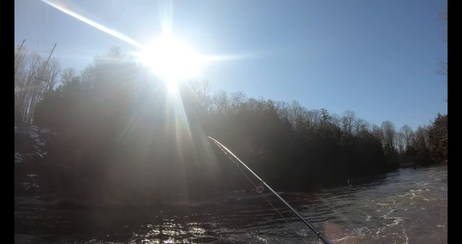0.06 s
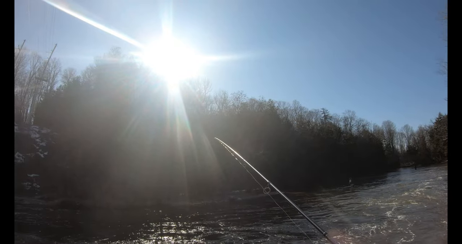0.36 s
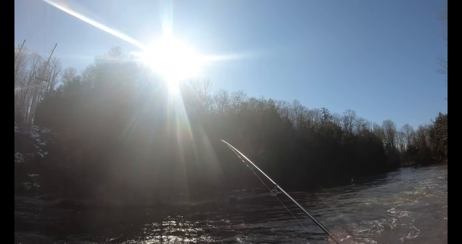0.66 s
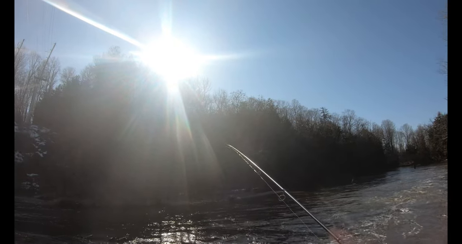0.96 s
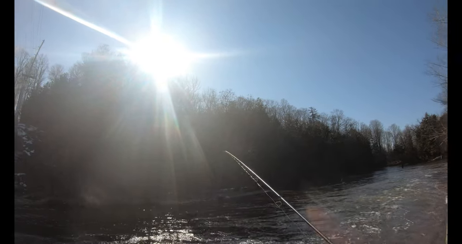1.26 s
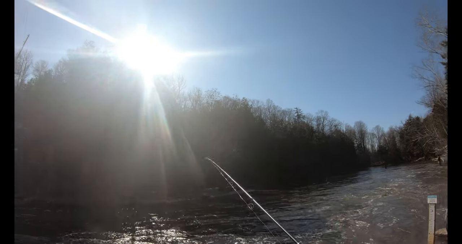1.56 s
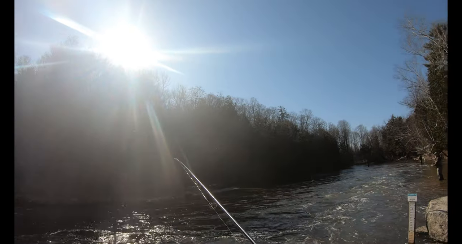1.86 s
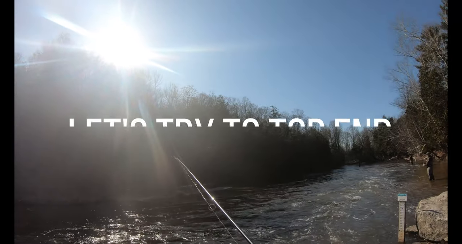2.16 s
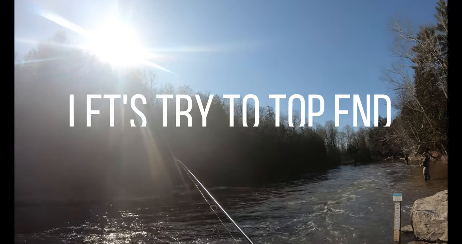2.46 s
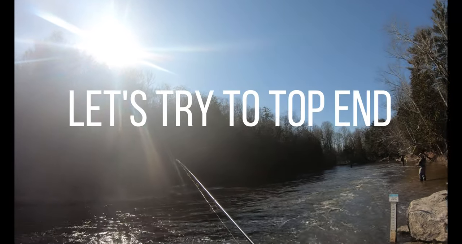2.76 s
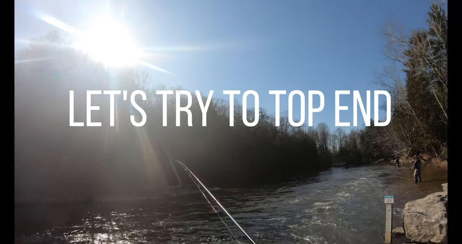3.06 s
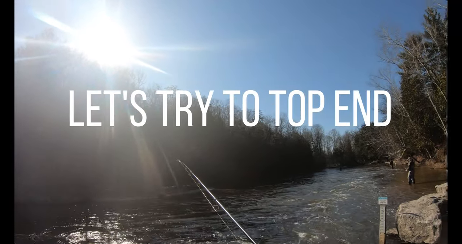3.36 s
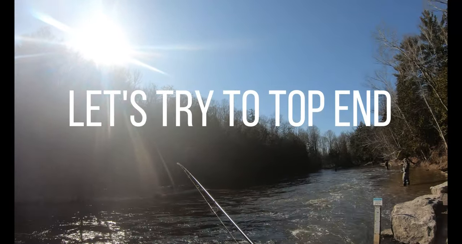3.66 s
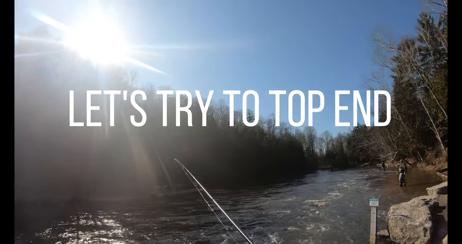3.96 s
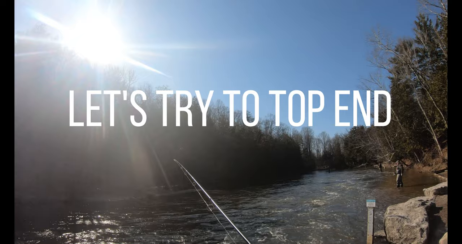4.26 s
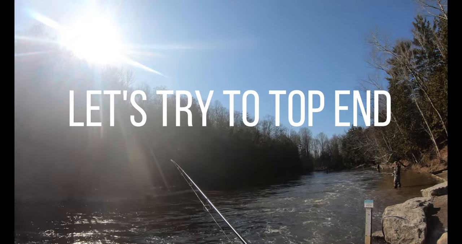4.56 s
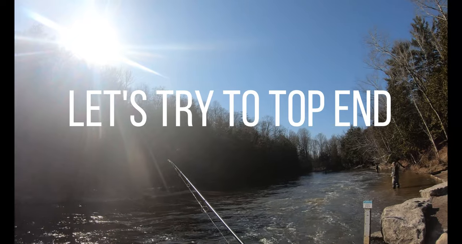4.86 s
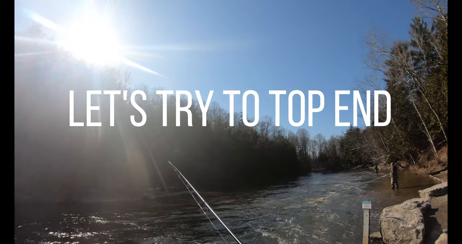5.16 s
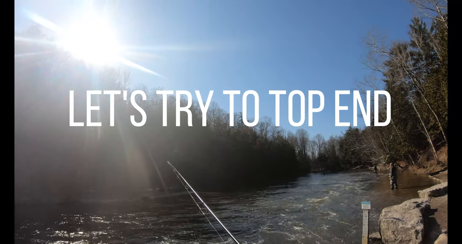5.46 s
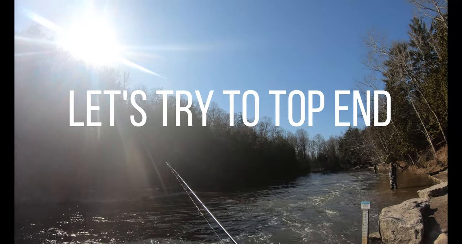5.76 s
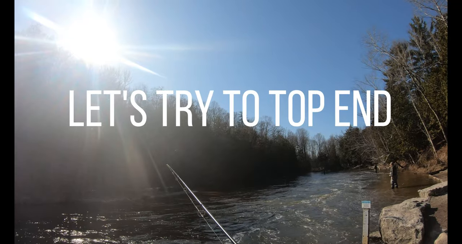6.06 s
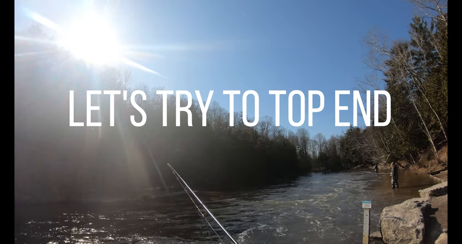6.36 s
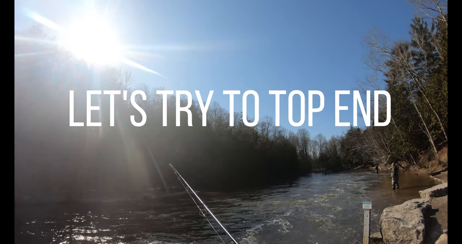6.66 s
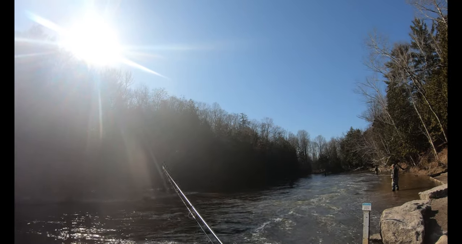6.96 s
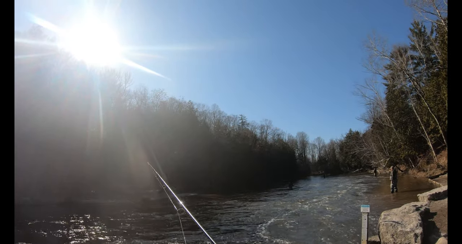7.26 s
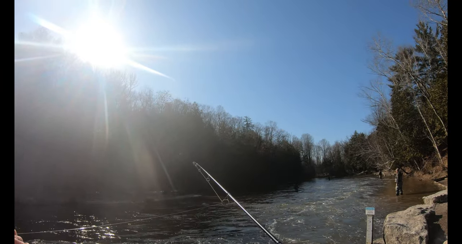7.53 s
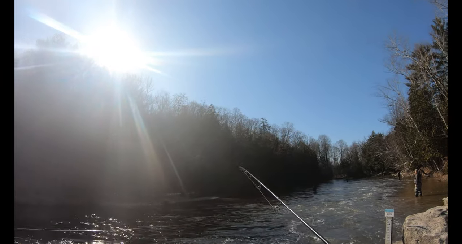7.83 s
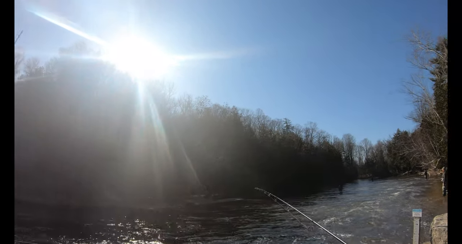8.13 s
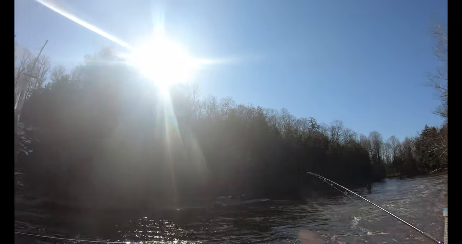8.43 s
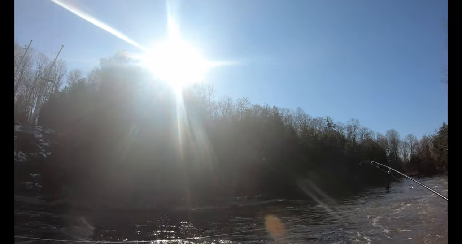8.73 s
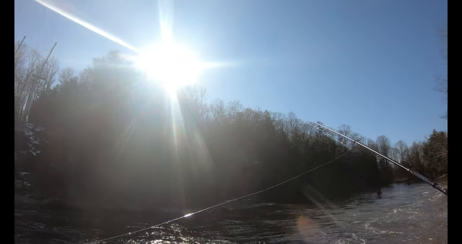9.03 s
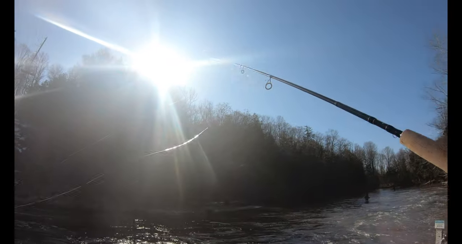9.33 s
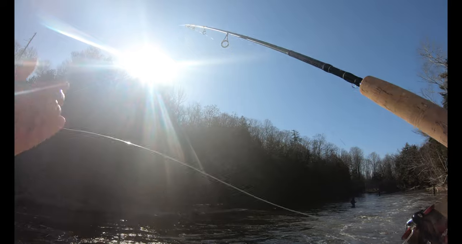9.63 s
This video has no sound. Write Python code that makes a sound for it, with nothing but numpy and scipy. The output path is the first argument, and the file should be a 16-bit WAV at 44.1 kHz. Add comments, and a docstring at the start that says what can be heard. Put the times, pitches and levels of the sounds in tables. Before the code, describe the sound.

Heard from the bank through microphones worn by an angler, river water churns and gurgles steadily, with little splashes, a few dull slaps of waves and low gusts of wind. Past the middle the wind softens and the sound opens out. Close by and slightly to the right come light taps of a fishing rod and a brief, quiet ratcheting of the reel, while the river keeps flowing.

```python
"""A fast river rushes below a dam, heard by two microphones worn by an angler. From the start, turbulence
and ringing bubbles make the water roar and fizz, wind eddies rumble on the ports, and waves break and
splash nearby. Near 1.5 s the angler turns downstream; from 5 s the wind eases and mono opens into stereo.
From 6.3 s the rod knocks now and then. Around 8 s the reel's ratchet ticks through a short run of line
as the angler turns back across the river."""
import sys
import numpy as np
from scipy import signal
from scipy.fft import rfft, irfft, next_fast_len
from scipy.io import wavfile
from scipy.ndimage import uniform_filter1d, map_coordinates

SR = 44100
rng = np.random.default_rng(int(sys.argv[2]) if len(sys.argv) > 2 else 0)


def generate_wav(signal):
    """Clip the signal to [-1, 1] and save it as 16-bit WAV at the path in sys.argv[1]."""
    frames = np.transpose(np.atleast_2d(signal))
    scaled = np.clip(frames, -1, 1) * 32767
    pcm = np.round(scaled).astype(np.int16)
    wavfile.write(sys.argv[1], SR, pcm)


N = 427329


def amp(db):
    """Decibels to amplitude ratio."""
    return 10 ** (np.asarray(db) / 20)


def unit(pair):
    """Normalise a stereo pair so that its mid signal has rms 1."""
    return pair / np.sqrt(np.mean(pair.mean(0) ** 2) + 1e-20)


def along(points, hz):
    """Interpolate (frequency_hz, value) points on a logarithmic axis."""
    knots_hz, values = np.transpose(points)
    return np.interp(np.log(hz + 1), np.log(knots_hz + 1), values)


def curves(rows):
    """Interpolate each column after time_s to one value per sample."""
    time_s, *columns = np.transpose(rows)
    return [np.interp(np.arange(N) / SR, time_s, column) for column in columns]


def wobble(rate_hz):
    """Smooth random modulation: a spline through rate_hz knots a second."""
    knots = rng.standard_normal(int(N * rate_hz / SR) + 4)
    return map_coordinates(knots, [np.arange(N) * rate_hz / SR])


def filtered(x, response):
    """Linear filtering: multiply the spectrum by a frequency response."""
    size = next_fast_len(N + 8192)
    return irfft(rfft(x, size) * response(np.fft.rfftfreq(size, 1 / SR)), size)[..., :N]


def coloured(x, spectrum):
    """Spectral shaping by (frequency_hz, gain_db) points."""
    return filtered(x, lambda hz: amp(along(spectrum, hz)))


def add(track, start_s, sound):
    """Superpose a sound on a track."""
    part = track[..., max(round(start_s * SR), 0):][..., :sound.shape[-1]]
    part += sound[..., :part.shape[-1]]


def churn(patchy_db):
    """Turbulence: two independent noises, modulated in patches of time and frequency."""
    spectra = signal.stft(rng.standard_normal((2, N)), nperseg=512)[2]
    patches = uniform_filter1d(rng.standard_normal(spectra.shape[1:]), size=12, axis=0)
    patches = uniform_filter1d(patches, size=7, axis=1)
    return unit(signal.istft(spectra * amp(patchy_db * patches / patches.std()), nperseg=512)[1][:, :N])


def bubble(turns, decay_cycles):
    """Trapped air rings as a damped oscillator; turns is its phase in cycles."""
    return np.sin(2 * np.pi * turns) * np.exp(-turns / decay_cycles) * (1 - np.exp(-turns))


def bubbles(count, low_hz, high_hz, decay_cycles, spread_db):
    """Incoherent sum of bubble resonances, most faint and a few strong, from random directions."""
    when, pitch, faintness, direction = rng.random((count, 4)).T[:, :, None]
    t = np.arange(256) / SR
    pitch_hz = low_hz * (high_hz / low_hz) ** pitch
    rings = amp(-spread_db * np.log(faintness + np.exp(-5))) * bubble(pitch_hz * t, decay_cycles)
    index = ((when * N).astype(int) + np.arange(len(t))).ravel()
    mid_side_gains = (1, np.sqrt(2) * np.cos(np.pi * direction))
    return unit(np.array([np.bincount(index, (rings * gain).ravel(), N)[:N] for gain in mid_side_gains]))


def droplets(low_hz, high_hz):
    """Sparse drops thrown up by the current plip as heavily damped resonances."""
    return amp(-21) * bubbles(320, low_hz, high_hz, decay_cycles=3, spread_db=3.5)


# direction of the water by level and by arrival time: frequency_hz, bias (-1 right .. 1 left)
LEVEL_BIAS = [(200, .2), (500, .42), (850, 0.45), (1900, 0.29), (3200, -0.077), (8200, -0.17), (9400, 0.24),
              (12000, .05)]
PHASE_BIAS = [(200, -0.4), (600, -0.6), (1600, -0.3), (2300, -0.13)]
def at_ports(pair, spectrum, side_spectrum):
    """Level and phase differences between the two ports place a coloured, partly diffuse source."""
    size = next_fast_len(N + 8192)
    hz = np.fft.rfftfreq(size, 1 / SR)
    mid, diffuse = rfft(pair, size) * amp(along(spectrum, hz))
    bearing = along(LEVEL_BIAS, hz) + 1j * along(PHASE_BIAS, hz)
    diffuse_share = np.sqrt(np.clip(1 - abs(bearing) ** 2, 0, 1))
    side = amp(along(side_spectrum, hz)) * (bearing * mid + diffuse_share * diffuse)
    return unit(irfft(np.array([mid + side, mid - side]), size)[:, :N])


# the angler's turn: time_s, heading (0 across the river .. 1 downstream)
TURN = [(0, 0.21), (1.45, 0.2), (1.85, 0.85), (7.3, 0.78), (8.1, 0.035), (9.69, 0.07)]
# stereo image at each heading: frequency_hz, side_over_mid_db
IMAGE_ACROSS = [(150, -7.5), (380, -7.5), (700, 1), (1100, 5.5), (1800, 5), (2500, 4), (4200, 0.5),
                (5500, 7), (8000, 7), (10000, 6)]
IMAGE_DOWN = [(150, -37), (380, -8.5), (700, -2), (1400, 9.5), (2300, 1.5), (4200, -4), (5500, 6.5),
              (8000, 8), (10000, 10)]
def turning(pair, across_spectrum, down_spectrum, across_db=0):
    """Directional pickup: the water's spectrum, image and level follow the angler's heading."""
    heading, = curves(TURN)
    across = at_ports(pair, across_spectrum, IMAGE_ACROSS)
    downstream = at_ports(pair, down_spectrum, IMAGE_DOWN)
    return amp(across_db * (1 - heading)) * unit((1 - heading) * across + heading * downstream)


# white water at each heading: frequency_hz, gain_db
ROAR_SPECTRUM_ACROSS = [(120, -17.5), (205, -7.5), (359, -7.5), (470, -10), (720, -12.5), (900, -19.5),
                        (1200, -34.5), (2020, -120)]
ROAR_SPECTRUM_DOWN = [(120, -14), (205, -4.5), (352, -8.5), (480, -11), (920, -19), (1200, -34.5),
                      (2020, -120)]
def roar(surge_db, gulp_db=0.45, gulp_hz=12):
    """Turbulence in distant white water radiates low noise that gulps unevenly."""
    water = turning(churn(patchy_db=0.15), ROAR_SPECTRUM_ACROSS, ROAR_SPECTRUM_DOWN, across_db=2.5)
    return amp(-2 + surge_db + gulp_db * wobble(gulp_hz)) * water


# wavelets at each heading: frequency_hz, gain_db
WASH_SPECTRUM_ACROSS = [(660, -14), (1120, -3), (1260, -6.5), (1750, -14.5), (2050, -16), (2480, -17.5),
                        (2960, -17.5), (4400, -25.5), (5720, -41), (9680, -120)]
WASH_SPECTRUM_DOWN = [(660, -5), (1120, -1), (1560, -13), (1940, -8), (2410, -10.5), (3100, -10.5),
                      (4400, -19.5), (5720, -65), (9680, -120)]
def wash(lapping_db):
    """Air entrainment: breaking wavelets mix midrange noise with ringing bubbles and drops."""
    ringing = amp(-15) * bubbles(8000, low_hz=1413, high_hz=4980, decay_cycles=5.6, spread_db=3)
    water = churn(patchy_db=1.12) + ringing + droplets(low_hz=1505, high_hz=4500)
    return amp(-15.5 + lapping_db) * turning(water, WASH_SPECTRUM_ACROSS, WASH_SPECTRUM_DOWN, across_db=5)


# foam at each heading: frequency_hz, gain_db
FIZZ_SPECTRUM_ACROSS = [(2650, -43), (4500, -6), (6080, -7.5), (8960, -7.5), (9480, -8.5), (10400, -20.5),
                        (11700, -26), (14600, -33), (15500, -49)]
FIZZ_SPECTRUM_DOWN = [(2650, -45), (4500, -2.5), (8240, -10), (9780, -16.5), (12000, -28.5), (14500, -35),
                      (15500, -38)]
def fizz(lift_db):
    """Resonant frequency varies inversely with radius, so the tiny bubbles of foam hiss in the treble."""
    ringing = amp(-9) * bubbles(10000, low_hz=4300, high_hz=11630, decay_cycles=6.3, spread_db=2)
    foam = churn(patchy_db=0.9) + ringing + droplets(low_hz=4500, high_hz=9500)
    return amp(-32.5 + lift_db) * turning(foam, FIZZ_SPECTRUM_ACROSS, FIZZ_SPECTRUM_DOWN, across_db=4)


# upwelling water: frequency_hz, gain_db
BOIL_SPECTRUM = [(110, -27), (190, 2.5), (280, -1.5), (370, -5), (480, -21), (1300, -120)]
# its strength: time_s, level_db
BOIL_LEVEL = [(0, -34), (.3, -29.5), (.5, -29), (.63, -48), (.9, -34), (1.13, -28), (1.3, -31.5),
              (1.52, -28.5), (1.78, -38.5), (1.95, -27.5), (2.15, -34), (2.7, -33.5), (2.9, -36),
              (3.3, -30), (3.55, -32.5), (4.2, -30), (5.28, -32), (5.5, -36.5), (5.9, -31.5), (6.42, -38.5),
              (6.62, -33.5), (6.8, -36), (7.2, -41), (7.6, -38.5), (8.6, -38), (9.12, -34.5), (9.4, -43)]
def boil():
    """Deep water welling up in the current makes amplitude-modulated low noise."""
    return amp(curves(BOIL_LEVEL)[0]) * at_ports(churn(patchy_db=0.86), BOIL_SPECTRUM, IMAGE_DOWN)


# waves near the bank: crest_s, half_length_s, roar_lift_db, surf_db, foam_lift_db
BANK_WAVES = [(.25, 0.24, 0.5, -47, 2.5), (1.278, 0.14, -0.6, -41.5, 3), (1.637, 0.16, 0.8, -45, 7.5),
              (2.853, 0.24, 0.5, -42, 5.5), (3.27, 0.23, 0.5, -46.5, 2), (3.747, 0.2, 1, -44.5, 2.5),
              (4.377, 0.19, 1.1, -41, 7.5), (5.765, 0.2, -1.3, -51.5, 2), (8.346, 0.56, -1, -52, 2.5)]
def waves():
    """Each wave modulates roar, foam and surf with a Gaussian envelope; surf adds in power."""
    crest_s, half_length_s, roar_lift_db, surf_db, foam_lift_db = np.transpose(BANK_WAVES)
    bells = np.exp(-((np.arange(N) / SR - crest_s[:, None]) / half_length_s[:, None]) ** 2)
    return roar_lift_db @ bells, foam_lift_db @ bells, np.sqrt(amp(surf_db) ** 2 @ bells)


# breaking waves at each heading: frequency_hz, gain_db
SURF_SPECTRUM_ACROSS = [(600, -26), (950, -7), (1150, -4), (1370, 2.5), (1650, -21), (2080, -2),
                        (2450, -17), (3000, -12.5), (4400, -15.5), (6000, -45), (9000, -120)]
SURF_SPECTRUM_DOWN = [(400, -17), (700, 7), (1170, 0), (1400, -12), (1600, -15.5), (1900, 0), (2370, -8.5),
                      (2700, -3), (3200, -4), (4400, -12.5), (6000, -46), (9000, -120)]
def surf(lapping_db):
    """Breaking waves trap air, which gurgles by bubble resonance."""
    ringing = amp(-7) * bubbles(8000, low_hz=1000, high_hz=4230, decay_cycles=4.6, spread_db=2.5)
    water = churn(patchy_db=1.2) + ringing
    return amp(lapping_db) * turning(water, SURF_SPECTRUM_ACROSS, SURF_SPECTRUM_DOWN)


# the steady current: time_s, level_db
CURRENT_LEVEL = [(0, -28.5), (.75, -30), (1.1, -28.5), (2.2, -29), (4.1, -30), (5.1, -29.5), (6.4, -33.5),
                 (7.2, -33), (8.2, -32), (9.69, -34.5)]
def river():
    """Common modulation fuses the water's layers: each wavelet lifts wash, fizz and surf together."""
    surge_db, foam_db, breaking = waves()
    lapping_db = 0.43 * wobble(14) + 0.67 * wobble(55) + .5 * wobble(240)
    current = roar(surge_db) + wash(lapping_db) + fizz(foam_db + 1.2 * lapping_db)
    return amp(curves(CURRENT_LEVEL)[0]) * current + breaking * surf(1.2 * lapping_db) + boil()


# gusts on the ports: time_s, level_db
GUSTS = [(0, -34), (.48, -28), (.72, -31), (1.4, -35.5), (1.68, -29), (1.82, -32), (2.4, -33.5),
         (2.7, -24.5), (3.05, -33.5), (3.85, -24.5), (4.3, -32.5), (4.58, -27), (5.3, -27.5), (5.9, -31),
         (6.6, -31.5), (7.82, -32.5), (7.97, -30), (8.13, -33.5), (9.69, -32.5)]
# their rumble: frequency_hz, gain_db
WIND_SPECTRUM = [(13, -52), (22, -10.5), (59, -1), (170, -4), (220, -33.5), (370, -120)]
def wind(side_db=-13, side_cutoff_hz=90, lumps_db=1.1):
    """Eddies make uneven pressure fluctuations; only the deepest differ between the two ports."""
    gust_db, = curves(GUSTS)
    mid, side = coloured(rng.standard_normal((2, N)), WIND_SPECTRUM)
    side = filtered(side, lambda hz: 1 / np.hypot(1, (hz / side_cutoff_hz) ** 2))
    rumble = unit(mid + amp(side_db) * side * np.array([[1], [-1]]))
    return amp(gust_db + lumps_db * wobble(11)) * rumble


# splashes close by: start_s, level_db, pitch_hz
NEAR_SPLASHES = [(.249, -27, 3120), (.353, -34, 2200), (.504, -32, 2800), (1.072, -35, 2900),
                 (1.184, -36, 5600), (1.461, -34, 4200), (1.514, -35, 2650), (2.006, -36, 2250),
                 (2.026, -46, 8400), (2.234, -36.5, 3200), (2.795, -32.5, 2500), (2.923, -35, 2650),
                 (3.191, -35.5, 5950), (3.379, -39, 6100), (3.674, -34, 2550), (4.264, -35, 4250),
                 (4.576, -30.5, 1010), (4.803, -38, 5950), (5.668, -37.5, 2450), (5.712, -35, 2200),
                 (5.762, -36, 2680), (5.995, -38, 2900), (6.414, -42.5, 7700), (6.629, -46, 4450),
                 (8.583, -34, 4550), (8.676, -31, 1800), (8.705, -32, 1900)]
def splashes(pitch_scatter=.1, rise_per_s=1.2, burst_s=.009, spray_t60_s=.035):
    """A puff of spray, then bubble resonance: one ring and five fainter ones, each rising slightly."""
    out, t = np.zeros((2, N)), np.arange(SR // 20) / SR
    for start_s, level_db, pitch_hz in NEAR_SPLASHES:
        band = signal.butter(2, [pitch_hz / 1.2, pitch_hz * 1.17], "bandpass", fs=SR)
        spray = unit(signal.lfilter(*band, rng.standard_normal((2, len(t)))))
        add(out, start_s, amp(level_db - 11 - 60 * t / spray_t60_s) * spray)
        for k, (detune, pan_db, late) in enumerate(rng.uniform(-1, 1, size=(6, 3))):
            bubble_hz = pitch_hz * np.exp(pitch_scatter * detune * min(k, 1))
            ring = bubble(bubble_hz * t * (1 + rise_per_s * t), decay_cycles=4.6)
            gains = amp(level_db - 1.5 - 1.4 * k + pan_db * np.array([[1], [-1]]))
            add(out, start_s + burst_s * (k + 1 + late / 2) / 6, gains * ring)
    return coloured(out, [(9000, 0), (11500, -18)])


# waves falling flat, and one thump of wind on the microphones at 1.68 s: start_s, level_db
SLAPS_AND_THUMP = [(1.443, -29.5), (1.68, -33), (4.341, -28), (9.14, -34)]
# their dull tone: frequency_hz, gain_db
BURST_SPECTRUM = [(150, -10), (330, 1), (600, -1), (850, -6), (1120, -3), (1500, -20), (3500, -27),
                  (7000, -60)]
def slaps_and_thump(rise_s=0.0078):
    """Pressure transients: a wave's slap or a thump of wind is a dull burst that swells fast and decays."""
    envelope, age = np.zeros(N), np.arange(SR // 8) / SR / rise_s
    for start_s, level_db in SLAPS_AND_THUMP:
        add(envelope, start_s, amp(level_db) * age * np.exp(1 - age))
    return envelope * at_ports(rng.standard_normal((2, N)), BURST_SPECTRUM, IMAGE_DOWN)


# rod and line knocking in the hand: start_s, level_db, brightness_hz
ROD_KNOCKS = [(6.295, -45, 7000), (6.974, -46, 7000), (7.022, -53, 12000), (7.047, -48, 8000),
              (7.078, -45, 13000), (8.666, -40, 7000), (8.964, -41, 5000), (9.017, -39, 4400),
              (9.130, -41, 7500), (9.411, -43, 4000), (9.595, -37, 8000), (9.632, -44, 13000),
              (9.658, -38, 6800), (9.674, -44, 5000)]
# the rod's response: frequency_hz, gain_db
ROD_SPECTRUM = [(1000, -26), (2500, -3), (4000, 4), (6200, -7), (7500, -12), (9500, -1), (11000, -28),
                (15000, -47)]
def rod(t60_s=.018):
    """Impact excitation of the swung rod: the softer the contact, the duller the dry knock."""
    out, t = np.zeros((2, N)), np.arange(SR // 20) / SR
    for start_s, level_db, brightness_hz in ROD_KNOCKS:
        band = signal.butter(2, [brightness_hz / 2, brightness_hz], "bandpass", fs=SR)
        contact = unit(signal.lfilter(*band, rng.standard_normal((2, len(t)))))
        add(out, start_s, amp(level_db - 3 - 60 * t / t60_s) * contact)
    return coloured(out, ROD_SPECTRUM)


# the reel's metallic modes: pitch_hz, level_db, t60_s
REEL_MODES = [(4680, -6, .08), (5450, -3, .008), (6300, -1, .006), (7980, 3, .008), (9100, -1, .005),
              (10800, -2, .006), (12000, -3.5, .008), (13100, -5, .007)]
def ratchet(ticks, mode_scatter=.007, snap_t60_s=.0055, drag_s=.0013):
    """Modal ringing: the pawl drags over each tooth, then drops with a snap that excites the reel."""
    out, t = np.zeros((2, N)), np.arange(SR // 20) / SR
    for start_s, level_db in ticks:
        detunes = 1 + mode_scatter * rng.standard_normal(len(REEL_MODES))
        ring = np.zeros((2, len(t)))
        for (pitch_hz, mode_db, t60_s), detune in zip(REEL_MODES, detunes):
            phase = 2 * np.pi * pitch_hz * detune * t + rng.normal(0, 1, (2, 1))
            ring += amp(mode_db - 60 * t / t60_s) * np.sin(phase)
        drag, snap = amp(5 - 60 * t / snap_t60_s) * rng.standard_normal((2, 2, len(t)))
        add(out, start_s, amp(level_db - 15) * drag)
        add(out, start_s + drag_s, amp(level_db) * (ring + snap))
    return coloured(out, [(1500, -22), (4500, 3), (8500, 4), (12500, -1), (15500, -15)])


# the sliding line: frequency_hz, gain_db
LINE_SPECTRUM = [(2000, -26.5), (4600, 5), (9000, -4), (12000, -10), (13900, -17), (15500, -19)]
def line_rasp(teeth_per_s, reference_teeth_per_s=39):
    """Sliding friction makes a rough noise that grows as a power of the line's speed."""
    rasp = unit(coloured(rng.standard_normal((2, N)), LINE_SPECTRUM))
    return amp(-63.5 + 3.5 * wobble(300)) * (teeth_per_s / reference_teeth_per_s) ** 1.2 * rasp


# line pulled from the reel: time_s, teeth_per_s, tick_db
LINE_PULL = [(7.602, 8, -53), (7.66, 14, -52), (7.7, 24, -50), (7.81, 32, -48.5), (7.87, 48, -48),
             (7.99, 40, -51), (8.07, 43, -44.5), (8.125, 32, -46), (8.15, 18, -66)]
def reel(slip_s=7.261, slip_db=-54):
    """One tooth slips; then running line rasps and drives ticks at the tooth-passing frequency."""
    t = np.arange(N) / SR
    teeth_per_s, tick_db = curves(LINE_PULL)
    teeth_per_s *= (t > LINE_PULL[0][0]) & (t < LINE_PULL[-1][0])
    teeth_passed = np.ceil(np.cumsum(teeth_per_s) / SR)
    ticks = [(i / SR, tick_db[i]) for i in np.flatnonzero(np.diff(teeth_passed))]
    return ratchet([(slip_s, slip_db)] + ticks) + line_rasp(teeth_per_s)


def close_right(pair, side_db=7.5, lean=.3):
    """Near field: a source close by reaches the ports very differently, the right one more strongly."""
    mid, diffuse = pair.mean(0), (pair[0] - pair[1]) / 2
    side = amp(side_db) * diffuse - lean * mid
    return np.array([mid + side, mid - side])


def scene():
    """Superposition of water, wind and tackle."""
    return river() + wind() + splashes() + slaps_and_thump() + close_right(rod() + reel())


# the opening image: time_s, width (0 mono .. 1 full stereo)
STEREO_WIDTH = [(0, 0.00096), (4.95, 0.00092), (5.3, 0.1), (5.6, 0.23), (6.1, 0.4), (7.0, 0.55)]
def record(dry, cutoff_hz=15700):
    """Mid-side scaling widens mono into stereo; a low-pass limits the bandwidth."""
    mid = dry.mean(0)
    side = (dry[0] - mid) * curves(STEREO_WIDTH)[0]
    return filtered(np.array([mid + side, mid - side]), lambda hz: hz < cutoff_hz)


dry = scene()
out = record(dry)
generate_wav(out)
```